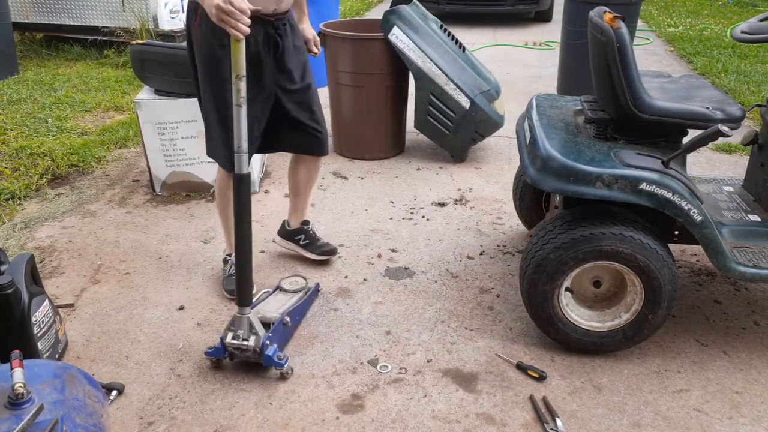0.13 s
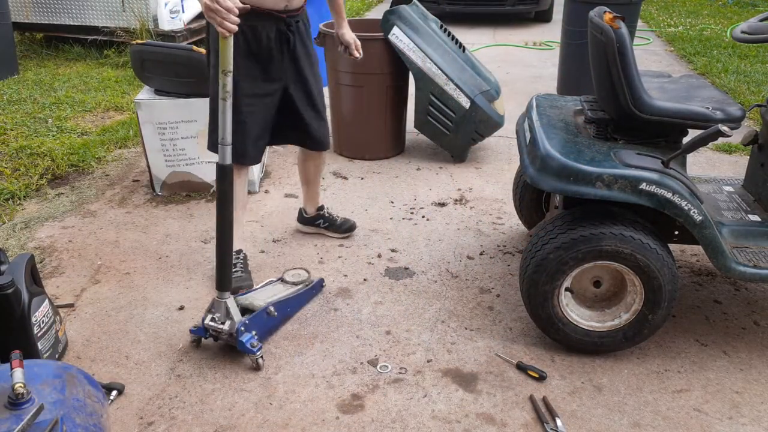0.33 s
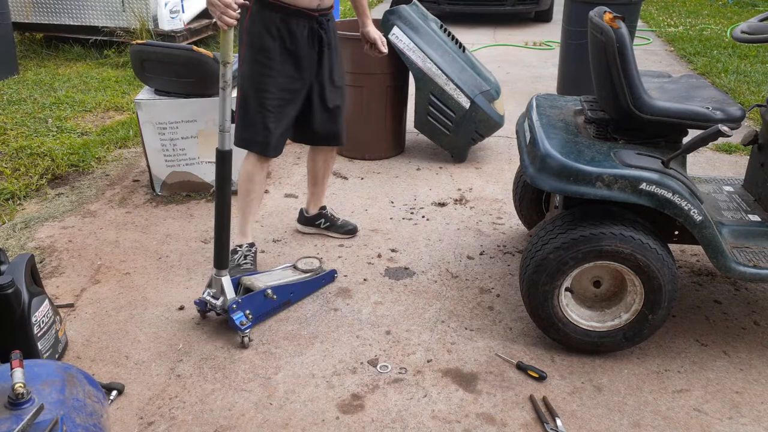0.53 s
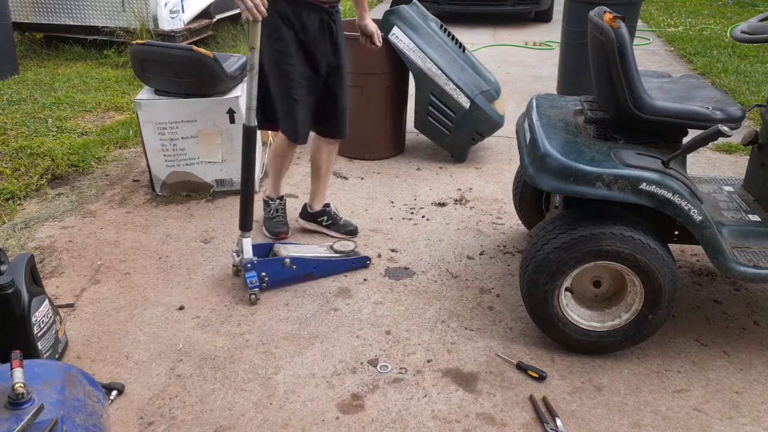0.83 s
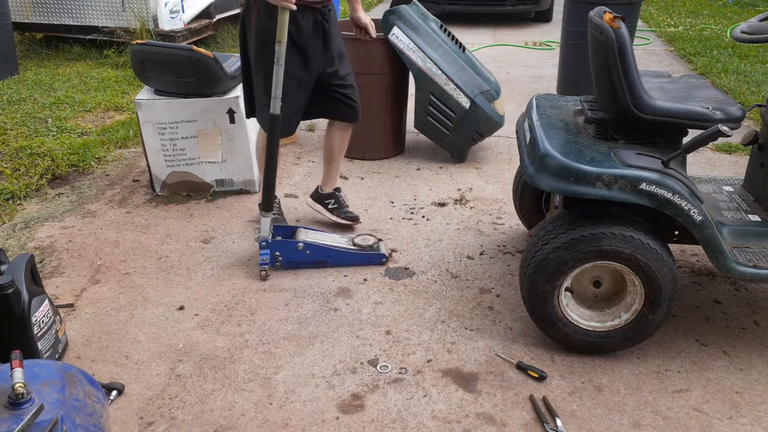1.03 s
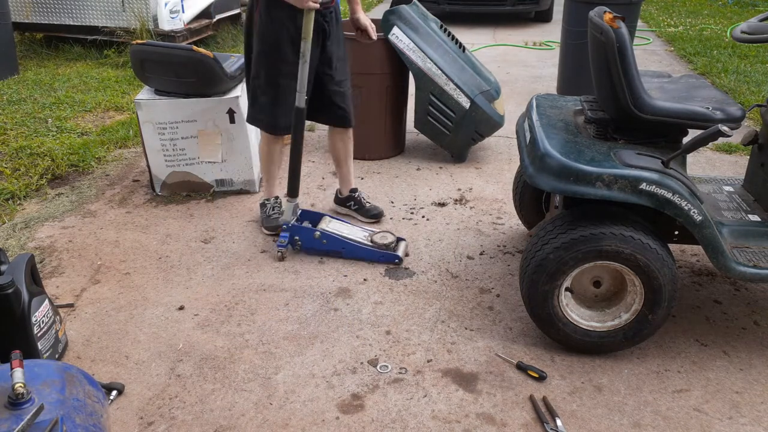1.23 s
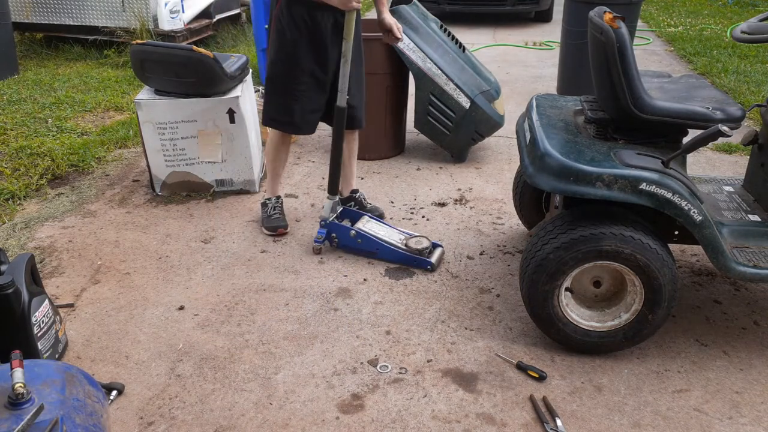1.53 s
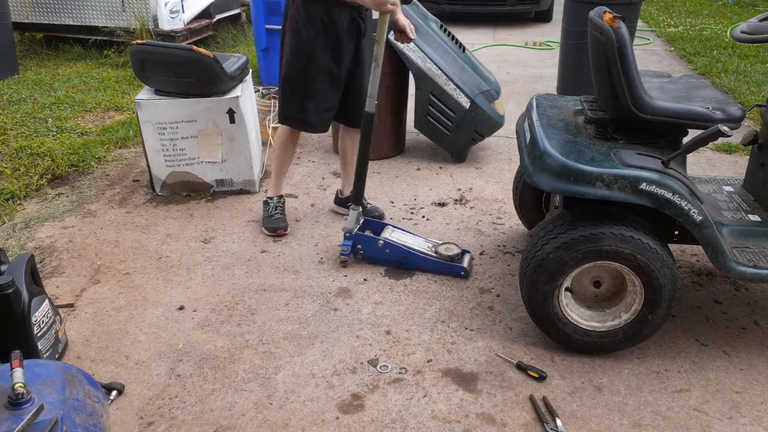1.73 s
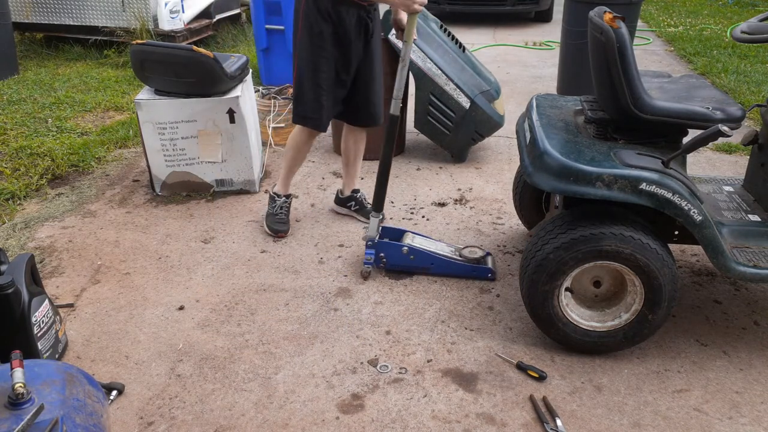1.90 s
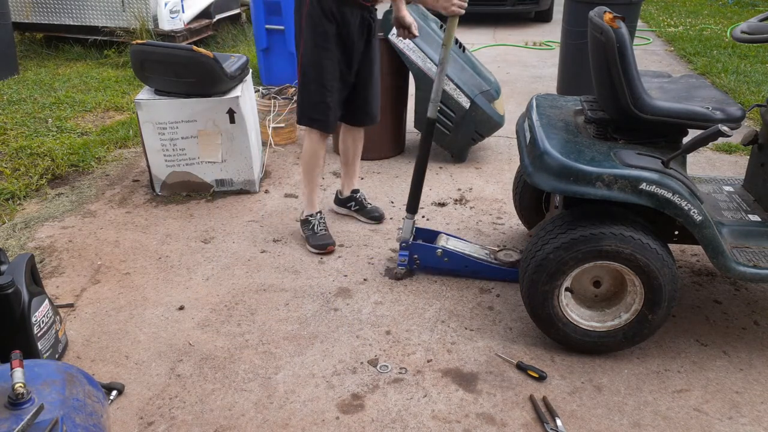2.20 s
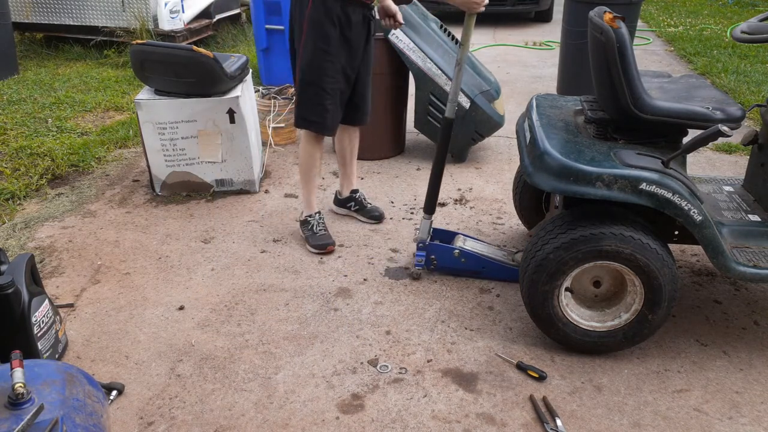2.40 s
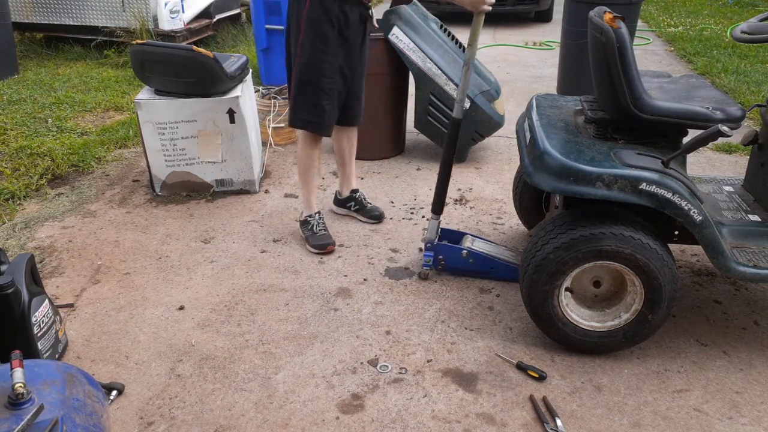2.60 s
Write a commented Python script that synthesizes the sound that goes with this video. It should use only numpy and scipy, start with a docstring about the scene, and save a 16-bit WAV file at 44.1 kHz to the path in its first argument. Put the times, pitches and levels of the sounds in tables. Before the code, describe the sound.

A steel floor jack rolls on concrete outdoors. A brief quiet roll opens, then at 0.2 s jolts begin and metallic rattling swells, loudest from 0.6 to 2 s, with irregular clanks, ringing plates, gritty wheel noise and tiny high axle squeaks. Sharp knocks cluster around 1.4-1.8 and 2.0 s. It weakens until 2.5 s, leaving faint grit, soft wind buffeting and steady air, moving slightly left to right.

```python
"""A steel floor jack is pushed over rough concrete outdoors, with gusty wind and faint steady air throughout.
A short quiet roll comes first; at 0.2 s jolts begin and the rolling swells, loudest from 0.6 to 2 s, then
it dies away to faint grit. Grit and jolts are impulses convolved with the ringing of frame, plates and loose
parts; single modes ping, squeak and drone as decaying sines or narrow noise; slab and wind are shaped noise."""
import sys
import numpy as np
from scipy import signal
from scipy.fft import rfft, irfft, next_fast_len
from scipy.io import wavfile
from scipy.ndimage import map_coordinates

SR = 44100
rng = np.random.default_rng(int(sys.argv[2]) if len(sys.argv) > 2 else 0)


def log_audio(samples):
    """Write samples as a 16-bit WAV file to the path given in sys.argv[1]."""
    # one column per channel
    frames = np.atleast_2d(samples).T
    # limit to full scale, then quantise
    limited = np.clip(frames, -1, 1)
    pcm = np.round(limited * 32767).astype(np.int16)
    wavfile.write(sys.argv[1], SR, pcm)


def how_loud(loudness_db):
    """Turn decibels into a plain amplitude multiplier (0 dB gives 1, 20 dB gives 10)."""
    steps = np.asarray(loudness_db, float) / 20
    return 10 ** steps


N = 121275


def unit(x):
    """Normalisation of power: scale to rms 1."""
    return x / np.sqrt(np.mean(x ** 2) + 1e-20)


def along(points, hz):
    """Interpolation of (Hz, value) points along a logarithmic frequency axis."""
    f, v = np.transpose(points)
    return np.interp(np.log(hz + 1), np.log(f + 1), v)


def curves(rows):
    """Linear interpolation in time: one value per sample for each column after the time."""
    s, *cols = np.transpose(rows)
    return [np.interp(np.arange(N) / SR, s, c) for c in cols]


def wobble(rate):
    """Slow random modulation: a smooth curve through random knots, rate of them a second."""
    knots = rng.standard_normal(400)
    return map_coordinates(knots, [np.arange(N) * rate / SR])


def filtered(x, response):
    """Linear filtering: the spectrum of x times a response of frequency."""
    n = x.shape[-1]
    m = next_fast_len(n + 8192)
    return irfft(rfft(x, m) * response(np.fft.rfftfreq(m, 1 / SR)), m)[..., :n]


# Likeness of the two ports. Each row: frequency in Hz, correlation of left and right.
ALIKE = [(60, 0.21), (130, 1), (290, 0.89), (640, 0.53), (1410, 0.62), (3100, 0.58), (6820, 0.21),
         (15000, -0.57)]


def pair(spectrum, size, alike=ALIKE):
    """Partial coherence: coloured noise of rms 1 whose mid and side shares set the left-right correlation."""
    def shape(hz):
        turn = np.arccos(np.clip(along(alike, hz), -1, 1)) / 2
        return how_loud(along(spectrum, hz)) * [np.cos(turn), np.sin(turn)]

    mid, side = filtered(rng.standard_normal((2, size)), shape)
    return unit(np.array([mid + side, mid - side]))


# Gusts on the microphone ports. Each row: start in seconds, level in dB before the random gusting.
WIND = [(0.0, -40), (0.09, -59.5), (0.12, -41), (0.17, -74), (0.21, -46), (0.46, -62), (1.06, -49),
        (1.41, -69), (1.88, -40.5), (1.94, -56), (2.24, -50.5), (2.27, -70), (2.65, -55), (2.75, -75)]
# Colour of the wind. Each row: frequency in Hz, relative level in dB.
BUFFET = [(15, -45), (30, -24), (42, -12), (55, 0), (110, -3), (160, -8), (230, -45), (350, -120)]
# Colour of the still air. Each row: frequency in Hz, relative level in dB.
AIR = [(88, -28), (150, -6.5), (1170, 2.5), (2140, -3.5), (2360, -6), (2860, -13), (15500, -20)]
AIR_DB = -60.5


def outdoors():
    """Turbulent pressure on the ports gives low gusting noise, separate at each port, over steady faint air."""
    gust = how_loud(curves(WIND)[0] + 3.3 * np.array([wobble(14), wobble(5)]))
    wind = gust * pair(BUFFET, size=N, alike=[(50, 0.49)])
    return wind + how_loud(AIR_DB) * pair(AIR, size=N)


# Rolling. Each row: start in seconds, then the levels in dB, before random unevenness, of the frame,
# the plates, the loose parts and the slab rumble.
ROLL = [(0.0, -44, -46, -55, -64), (0.14, -65, -68, -72, -62.5), (0.17, -63, -67, -79, -83),
        (0.21, -37.5, -50, -84, -39.5), (0.27, -36, -35.5, -42, -49), (0.37, -36.5, -37.5, -41.5, -48),
        (0.51, -30.5, -30.5, -34.5, -43.5), (0.6, -24, -28, -32, -42.5), (0.63, -32.5, -33.5, -32.5, -35.5),
        (0.66, -32, -28.5, -34, -43), (0.73, -25, -26.5, -29, -42), (0.8, -28, -23, -30.5, -44),
        (0.94, -24.5, -23.5, -23, -41), (0.96, -29.5, -29, -28.5, -46), (1.0, -24, -24, -26, -36.5),
        (1.06, -32.5, -23.5, -30, -50), (1.17, -27.5, -29.5, -31.5, -42.5), (1.39, -34.5, -30, -34, -45.5),
        (1.57, -29, -25.5, -35.5, -41.5), (1.64, -27.5, -24.5, -31.5, -36.5),
        (1.68, -26, -19, -31.5, -39.5), (1.79, -24.5, -32, -24.5, -41.5), (1.91, -28.5, -22, -35, -44),
        (1.98, -31, -31.5, -37, -45.5), (2.04, -30, -25.5, -35, -42), (2.16, -35, -37, -38.5, -47.5),
        (2.21, -38, -36, -38, -42), (2.25, -37.5, -41, -48, -51), (2.28, -37.5, -40, -48, -41.5),
        (2.32, -39, -40.5, -49, -50), (2.38, -45, -49.5, -53, -50), (2.47, -41.5, -41.5, -48.5, -47),
        (2.59, -61, -67, -72, -65), (2.75, -57, -63, -62, -56)]
# Colour of the slab. Each row: frequency in Hz, relative level in dB.
SLAB = [(47, -38), (80, -19), (119, -13), (258, -5.5), (418, -37.5), (600, -11), (780, -13), (1320, -120)]


def slab():
    """Structure-borne sound: the wheels send a low rumble through the concrete, as shaped noise."""
    level = how_loud(curves(ROLL)[3] + 0.83 * wobble(25.31))
    return level * pair(SLAB, size=N)


def singing(rows, width_hz):
    """Frictional excitation of a mode: narrow-band noise, a slightly rough tone that swells and fades."""
    out, t = np.zeros((2, N)), np.arange(N) / SR
    for s, length, hz, db in rows:
        turn = np.arccos(np.clip(along(ALIKE, hz), -1, 1)) / 2
        a, b = filtered(rng.standard_normal((2, N)), lambda f: 1 / (1 + ((f - hz) / width_hz) ** 2))
        tone = np.cos(turn) * a + np.sin(turn) * b * np.array([[1], [-1]])
        swell = np.abs(np.sin(np.pi * np.clip((t - s) / length, 0, 1))) ** .5
        out += how_loud(db) * unit(tone) * swell
    return out


# Modes that the rolling keeps humming. Each row: start in seconds, length in seconds, frequency in Hz,
# level in dB at the top of the swell.
DRONES = [(.38, 0.81, 1272, -39), (.5, 1, 1967, -47), (1.5, .45, 3920, -47), (1.63, 0.081, 1846, -27),
          (1.85, 0.72, 497, -53.5), (2.05, 0.44, 198, -52), (2.32, 0.24, 139, -50)]


def drones():
    """Sustained resonance: the rolling keeps a few narrow modes humming for a while."""
    return singing(DRONES, width_hz=22)


# Brief squeaks of an axle, one mode each. Each row: start in seconds, length in seconds, frequency in Hz,
# level in dB at the top of the swell.
SQUEAKS = [(0.406, 0.024, 5650, -29), (.487, 0.012, 5650, -32), (0.404, 0.017, 10400, -38),
           (0.484, 0.029, 11190, -26), (0.604, .025, 6150, -37), (0.658, .015, 12000, -23),
           (1.035, 0.032, 9215, -27), (1.22, .03, 10400, -30), (1.328, .025, 5670, -27.5),
           (1.906, .07, 10500, -32), (2.123, 0.083, 11900, -36), (2.145, 0.024, 10540, -35),
           (2.155, .025, 6000, -35.5), (2.2, 0.027, 5640, -37), (2.204, .05, 10620, -37),
           (2.282, 0.043, 11640, -40), (2.712, .05, 5500, -56)]


def squeaks():
    """Frictional squeal: an axle rubs one mode at a time, briefly and with a wider band than the drones."""
    return singing(SQUEAKS, width_hz=120)


# Jolts. Each row: start in seconds, drive of the plates in dB, of the frame in dB and of the loose parts
# in dB (each before that part's offset), chatter t60 in seconds, favoured mode in Hz.
JOLTS = [(0.2037, -19.5, -18.5, -18.5, 0.14, 1270), (0.2418, -20, -23.5, -22, 0.11, 2070),
         (0.333, -36, -28.5, -36, 0.071, 2030), (0.383, -18, -26, -26.5, 0.11, 2060),
         (0.4489, -23, -43, -23.5, 0.11, 1230), (0.5049, -34, -31, -39, 0.11, 1220),
         (0.583, -32, -30, -34, 0.031, 1970), (0.6418, -24.5, -27, -28.5, 0.12, 1290),
         (0.6658, -25.5, -41, -30.5, 0.1, 1320), (0.7328, -17.5, -23, -30, 0.16, 1240),
         (0.815, -20, -38, -42, 0.067, 3080), (0.8487, -15, -19, -37, 0.16, 3110),
         (0.9286, -24, -26, -38, 0.054, 1260), (1.0024, -39, -37, -31, 0.052, 2020),
         (1.0348, -11, -22, -21, 0.092, 2470), (1.0916, -23.5, -41, -45, 0.068, 1340),
         (1.22, -17.5, -26, -25, 0.043, 1330), (1.287, -28, -29, -39, 0.15, 2320),
         (1.3787, -20.5, -27, -29, 0.029, 4730), (1.4247, -12, -45, -30, 0.022, 4680),
         (1.4384, -32, -31, -47, 0.03, 4660), (1.463, -12.5, -44, -30, 0.034, 4420),
         (1.4979, -23, -45, -52, 0.066, 4000), (1.5198, -15, -25, -28.5, 0.16, 4040),
         (1.5683, -13.5, -39, -41, 0.036, 4050), (1.604, -13, -30, -44, 0.044, 2780),
         (1.6595, -17, -22, -31, 0.053, 2860), (1.7823, -13, -18.5, -45, 0.082, 3050),
         (1.8211, -13, -17.5, -23.5, 0.1, 1880), (1.916, -31, -39, -26, 0.06, 3340),
         (1.9993, -20, -29, -43, 0.064, 2980), (2.0227, -12.5, -17.5, -16, 0.11, 2180),
         (2.0483, -14, -23.5, -24, 0.17, 3470), (2.179, -22, -22, -30, 0.034, 1220),
         (2.2128, -37, -28, -42, 0.11, 5700), (2.2608, -28.5, -27.5, -45, 0.052, 3340),
         (2.2939, -23, -25.5, -41, 0.056, 2560), (2.361, -37.5, -37, -37.5, 0.07, 2350),
         (2.3873, -34, -37, -40, 0.091, 1950), (2.4186, -27, -22, -49, 0.04, 1500),
         (2.4482, -19.5, -29, -34, 0.081, 3830), (2.565, -61, -45, -60, 0.043, 1930),
         (2.584, -64, -55, -56, 0.06, 1910), (2.6387, -54, -41.5, -52, 0.1, 2270),
         (2.7247, -43, -52, -65, 0.044, 2300)]
CHATTER_RISE_S = .0004  # time constant of every jolt's onset
PING_DB, PING_S = -5.5, 0.02  # level over the stronger of plates and frame drive, t60


def pings():
    """Modal selection: each jolt rings one favoured mode as an exponentially decaying sine."""
    out, t = np.zeros((2, N + SR)), np.arange(SR // 10) / SR
    turns = rng.normal(0, 0.34, (len(JOLTS), 2, 1))  # phase at each port, rad
    for row, turn in zip(JOLTS, turns):
        decay = how_loud(max(row[1:3]) + PING_DB - 60 * t / PING_S)
        level = decay * (1 - np.exp(-t / CHATTER_RISE_S))
        out[:, round(row[0] * SR):][:, :len(t)] += level * np.sin(2 * np.pi * row[5] * t + turn)
    return out[:, :N]


CRACK_DB, CRACK_S = 15, .005  # the contact itself: level over the dense ringing, t60
MODES_DB, MODE_SCATTER_DB = 1.5, 3  # offset of all modes, random spread of each
BODY_FROM_HZ = 250


def struck(spectrum, modes, ring_s):
    """Impulse response of one part at one spot: a crack, dense ringing and its clearest damped modes."""
    t = np.arange(SR // 8) / SR
    ring = pair(spectrum, size=len(t)) * (how_loud(-60 * t / ring_s) + how_loud(CRACK_DB - 60 * t / CRACK_S))
    top = max(db for _, db in spectrum)
    for hz, width_hz, db in modes:
        turn = rng.normal(0, 1, (2, 1)) * np.arccos(np.clip(along(ALIKE, hz), 0, 1))
        colour = along(spectrum, hz) - top
        level = how_loud(db + MODES_DB + colour + MODE_SCATTER_DB * rng.standard_normal())
        # a resonance decays faster the wider it is
        ring = ring + level * np.sin(2 * np.pi * hz * t + turn) * np.exp(-np.pi * width_hz * t)
    ring = signal.sosfilt(signal.butter(3, BODY_FROM_HZ, "high", fs=SR, output="sos"), ring)
    return ring / np.linalg.norm(ring) * np.sqrt(2)


GRIT_PER_S, GRIT_SPREAD_DB = 3000, 3.5  # mean rate of grains, scale of their exponential spread
BIGGEST = 4.5  # largest grain, in spreads
BUMP_DB, FLUTTER_DB = .7, 1.5  # slow and fast unevenness


def grit():
    """Random impulse train: grains of either sign and many sizes pass under the wheels unevenly."""
    present = rng.random(N) < GRIT_PER_S / SR
    size = how_loud(GRIT_SPREAD_DB * np.minimum(rng.exponential(1, N), BIGGEST))
    grains = unit(present * size * rng.choice([-1, 1], N) * how_loud(BUMP_DB * wobble(27) + FLUTTER_DB * wobble(44.37)))
    return grains


# Broad colour of each part. Each row: frequency in Hz, relative level in dB.
FRAME = [(220, -30), (350, -13), (680, -6), (1030, -4), (1250, 0), (1700, -1), (2500, -1), (3200, -9),
         (4500, -30), (7000, -120)]
PLATES = [(1400, -34), (2200, -9), (2900, -2), (4000, -2), (5200, -3), (6160, -2), (6900, -8), (8300, -12),
          (11000, -32), (16000, -120)]
LOOSE = [(5000, -40), (7500, -3), (9500, -5), (10800, -3), (11700, 1), (12400, 0), (13000, -8), (14200, -7),
         (15600, -8), (15900, -40), (16300, -90)]
# Clearest modes of each part. Each row: frequency in Hz, bandwidth in Hz, level in dB against the
# part's colour, before offset and scatter.
FRAME_MODES = [(492, 25, -3), (860, 40, -2), (1100, 40, -2), (1262, 35, 1), (1517, 55, -1), (1826, 45, -1),
               (1977, 35, -1), (2400, 35, -2), (2548, 30, -2)]
PLATE_MODES = [(2880, 35, 0), (2990, 60, 0), (3380, 50, 0), (3613, 35, -2), (3925, 30, 0), (4148, 35, -1),
               (4615, 60, 0), (5645, 60, -2), (6100, 200, 3), (7080, 44, -2)]
LOOSE_MODES = [(9215, 140, 0), (10400, 240, 1.8), (11260, 39, 2.2), (12600, 71, 0.21), (14600, 80, 0)]
# Dense ringing of frame, plates and loose parts: t60 in seconds.
RING_S = (.12, .09, .06)
# Offset of a jolt's drive on frame, plates and loose parts, in dB.
JOLT_DB = (2, 0.5, 7)
FIRST_BLOW, PART_SCATTER_DB = 4.5, 1.2  # first impulse of a jolt, each part's own unevenness


def jack(count=16):
    """Source-filter principle: grit and chattering jolts are convolved with three parts, at one of several spots."""
    grains = grit()
    region = np.repeat(rng.integers(0, count, N // 500 + 1), 500)[:N]
    spot = (region + rng.integers(0, 3, N)) % count
    t = np.arange(SR // 8) / SR
    shape = (len(JOLTS), len(t))
    chatter = rng.standard_normal(shape) * (rng.random(shape) < .3)  # sparse rattling blows
    out = np.zeros((2, N))
    # the last entry is the part's column in JOLTS
    parts = [(FRAME, FRAME_MODES, 2), (PLATES, PLATE_MODES, 1), (LOOSE, LOOSE_MODES, 3)]
    for k, (spectrum, modes, col) in enumerate(parts):
        blows = np.zeros((count, N + len(t)))
        blows[spot, np.arange(N)] = grains * how_loud(curves(ROLL)[k] + PART_SCATTER_DB * wobble(30.65))
        for j, row in enumerate(JOLTS):
            burst = chatter[j] * how_loud(-60 * t / row[4]) * (1 - np.exp(-t / CHATTER_RISE_S))
            burst[0] = FIRST_BLOW
            blows[j % count, round(row[0] * SR):][:len(t)] += how_loud(row[col] + JOLT_DB[k]) * burst
        for b in blows:
            response = struck(spectrum, modes, RING_S[k])
            out += signal.fftconvolve(b[None, :N], response, axes=1)[:, :N]
    return out


# Lag of the left port as the jack crosses to the right. Each row: time in seconds, lag in samples.
LEFT_LAG = [(0, -6.5), (2.75, 3)]


def scene():
    """Interaural-style time difference: the jack reaches the left port first, later the right, amid outdoor air."""
    left, right = slab() + drones() + squeaks() + pings() + jack()
    left = map_coordinates(left, [np.arange(N) - curves(LEFT_LAG)[0]], mode="nearest")
    return outdoors() + np.array([left, right])


def low_pass(x):
    """Removes everything above the highest recorded frequency."""
    return signal.sosfilt(signal.butter(12, 17000, fs=SR, output="sos"), x)


# Sensitivity of the ports. Each row: frequency in Hz, left minus right in dB.
BALANCE_DB = [(60, 14), (110, -4), (200, 2), (380, 1), (700, -1), (1290, 3), (2380, 1.5), (4400, 2),
              (8120, -0.5), (15000, 3.5)]
MIC_FROM_HZ, TOP_HZ = 32, 15850  # low roll-off, band limit


def record(dry):
    """Transducer response: ports of unequal sensitivity roll off the lowest bass and stop at a band limit."""
    def response(hz):
        band = (hz < TOP_HZ) / (1 + (MIC_FROM_HZ / (hz + 1)) ** 4)
        return band * how_loud(along(BALANCE_DB, hz) * np.array([[.5], [-.5]]))

    ports = filtered(dry, response)
    return low_pass(ports)


dry = scene()
out = record(dry)
log_audio(out)
```